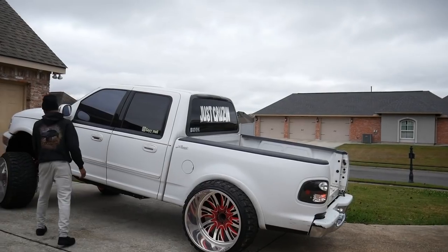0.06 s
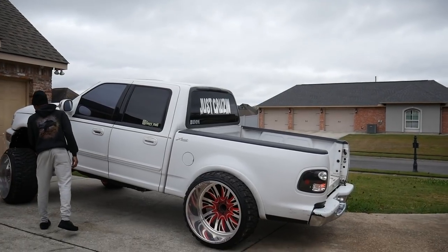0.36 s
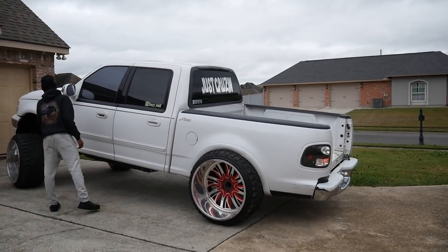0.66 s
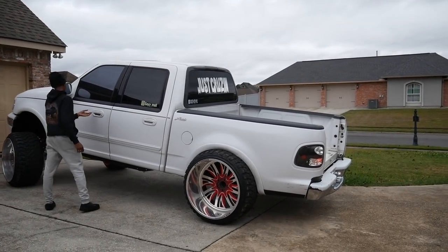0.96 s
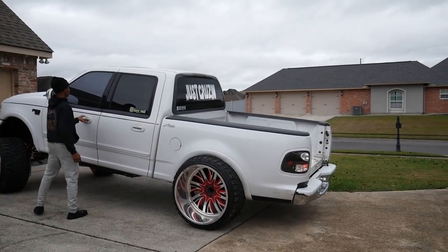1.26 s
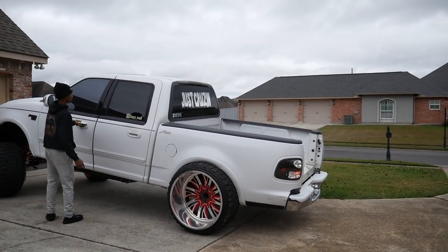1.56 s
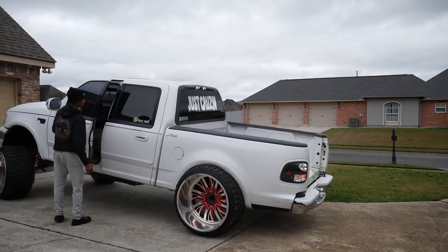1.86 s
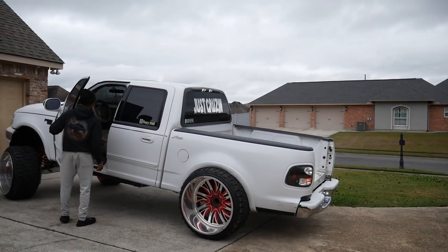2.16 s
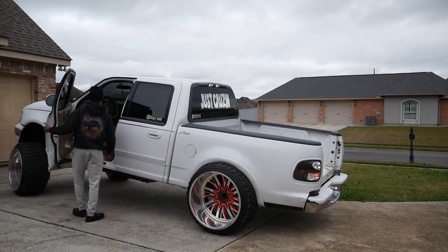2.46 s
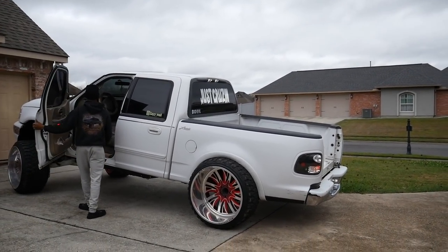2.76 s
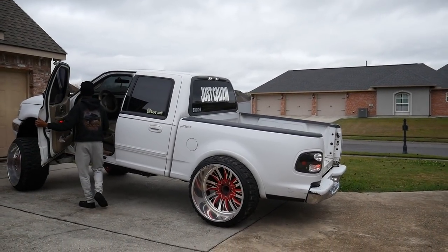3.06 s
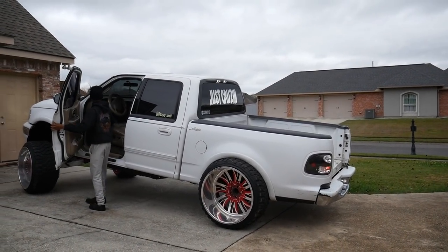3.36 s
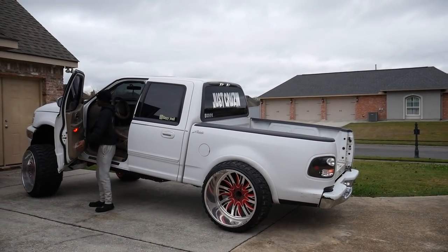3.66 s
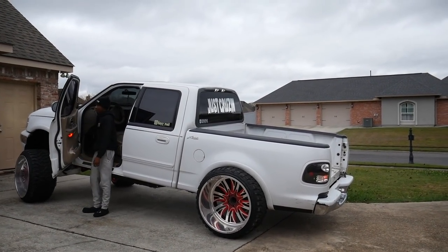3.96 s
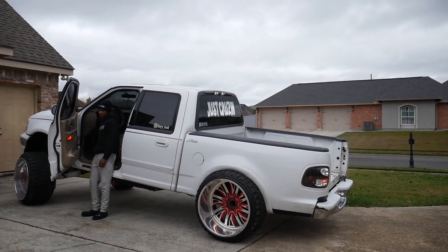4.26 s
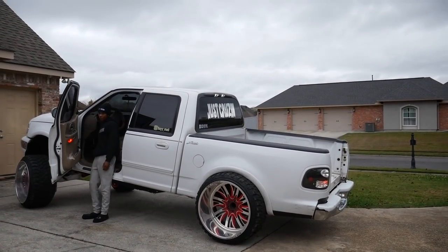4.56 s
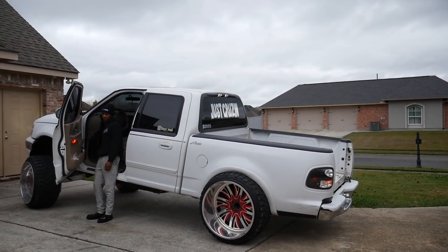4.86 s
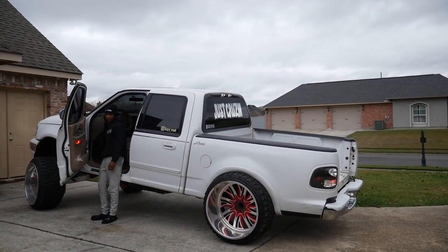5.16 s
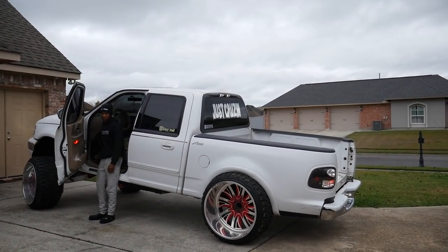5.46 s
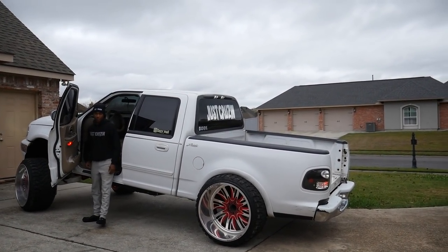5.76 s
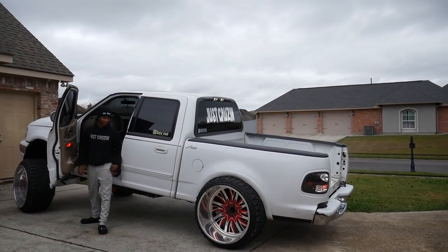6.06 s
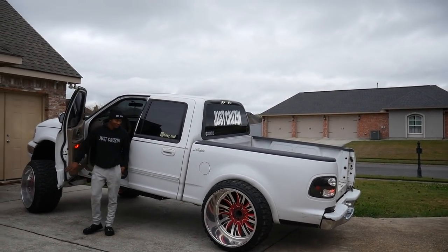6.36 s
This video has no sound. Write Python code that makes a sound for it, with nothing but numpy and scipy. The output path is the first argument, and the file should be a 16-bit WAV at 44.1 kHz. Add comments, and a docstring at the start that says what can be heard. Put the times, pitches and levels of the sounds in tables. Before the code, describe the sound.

A pickup truck idles close by in a driveway, its open exhaust beating with a deep, uneven throb over a light engine hiss and thin belt whine. A few very faint shoe scuffs and door latch clicks sit underneath. After nearly five seconds the engine is revved once, hard, rising into a rasping roar, then winds down with spits and dull pops. A short echo comes off the house and concrete.

```python
"""A V8 pickup, revved once

A truck with an open exhaust idles with a lope (an uneven beat) in a driveway, is revved once, spits
as it coasts and winds down. Uneven firings ring the pipe; at speed they merge into a drone and drive
rushes of rasping gas. Belt pulleys whine, the engine bay hisses and ticks, shoes and a door latch tap
lightly, and the house and the concrete throw it all back."""
import sys
import numpy as np
from scipy import signal
from scipy.fft import rfft, irfft, next_fast_len
from scipy.io import wavfile
from scipy.ndimage import uniform_filter1d

SR = 44100
rng = np.random.default_rng(int(sys.argv[2]) if len(sys.argv) > 2 else 0)


def store_pcm(level_fs):
    """Save levels as 16-bit WAV."""
    pcm = np.round(np.clip(level_fs, -1, 1) * 32767).astype(np.int16)
    wavfile.write(sys.argv[1], SR, np.atleast_2d(pcm).T)


N = 282681

# Engine speed, with eight firings in two turns of the crank: (time [s], firing rate [Hz])
FIRING_RATE = [(0, 57.04), (1.5, 57.13), (2.7, 56.74), (3.2, 57), (4.69, 56.93), (4.85, 94), (5.0, 125),
               (5.17, 196), (5.24, 216), (5.37, 223), (5.6, 192), (6.0, 147), (6.41, 110)]
# The cylinders in firing order: (strength at idle [dB], lateness at idle [crank degrees],
# strength at speed [dB], lateness at speed [crank degrees])
CYLINDERS = [(2, -45.5, -1, 7), (0.5, 16.5, 2.5, 30.5), (4.5, -6, -11.5, 17.5), (4, -35, 0, -6.5),
             (2.05, -45, 0.5, 17), (1.1, -45, -3, 11), (6, -11, 0, -3), (3.5, -12, 0.5, 34)]
# The gas pedal: (time [s], how far down [0-1])
PEDAL = [(5.21, 1), (5.27, 0.4)]
# Pulses are hard under load and soft once the throttle closes: (time [s], hardness [0-1])
HARDNESS = [(4.69, 0), (4.78, 0.3), (5.0, 0.3), (5.15, 0.54), (5.45, 0.5), (5.8, 0.17), (6.1, 0.08),
            (6.41, 0.23)]
# Ragged burning as the engine coasts down: (time [s], raggedness [0-1])
RAGGEDNESS = [(5.5, 0), (5.78, 1)]
# Tone of the soft and of the hard pulses: (frequency [Hz], gain [dB])
SOFT_PULSE = [(25, -60), (45, 1.5), (56, -19), (80, -1), (115, -1.15), (150, -13.5), (260, -9.5),
              (450, -16.5), (600, -21.5), (900, -34), (1500, -31.5), (4000, -78)]
HARD_PULSE = [(45, -60), (65, -37), (90, -29), (115, 1.5), (140, -10.5), (190, 5), (260, -19), (310, -4.5),
              (450, -4.5), (600, -20), (900, -18), (1500, -19), (4000, -79)]
# Resonances, the pitches at which the pipe rings: (frequency [Hz], width [Hz], boost [dB])
PIPE_RESONANCES = [(96.3, 8.3, 10.5), (136.33, 19.9, 31.5), (196.5, 73.5, 13), (329.7, 74, 6),
                   (435.7, 43.3, 15)]
# Loudness of the exhaust note: (time [s], level [dB])
EXHAUST_LEVEL = [(0, -23), (4.72, -22.5), (4.8, -26), (4.97, -27.5), (5.14, -20.5), (5.26, -25),
                 (5.42, -24.5), (5.65, -23.5), (5.85, -20.5), (6.0, -22.5), (6.14, -27.5), (6.41, -24.5)]
# Gaps in the idle's beat: (place in the firing order [firings], depth [dB])
LOPE_GAPS = [(3.9, -2), (4.6, -2.5), (7.05, -5)]
# Slow swell of the exhaust's middle pitches: (time [s], boost [dB])
MIDRANGE_BOOST = [(0, -2), (1.5, 0), (2.6, 5), (3.5, 2), (4.7, 4)]
# Overtones of the eight-firing cycle, relative to the exhaust note:
# (multiple of the cycle rate, level with pedal down [dB], level coasting [dB])
OVERTONES = [(5, -17, -15), (6, -22, -14), (9, -12, -11), (10, -11, -14), (11, -12, -9.5), (13, -13, -16),
             (16, -18, -14), (19, -17, -26)]
# Resonances of the hot pipe that they glide through: (frequency [Hz], width [Hz], boost [dB])
HOT_PIPE_RESONANCES = [(127, 66, 6), (181, 100, 7), (325, 55, 5), (462, 57, 13)]
# The clean tone at the firing rate: (time [s], level [dB])
FIRING_TONE = [(4.78, -23), (4.9, -32), (5.03, -25), (5.17, -26.5), (5.28, -42), (5.34, -44), (5.42, -20.5),
               (5.6, -32.5), (5.9, -31.5), (6.1, -46), (6.3, -29)]
# Three pipe resonances that roar above idle: (frequency [Hz], width [Hz])
ROAR_RESONANCES = [(325, 136), (445, 70), (600, 200)]
# Their loudness: (time [s], lower [dB], middle [dB], upper [dB])
ROAR_LEVELS = [(4.83, -36.5, -33, -34), (4.98, -35, -44, -48), (5.08, -28, -35, -35),
               (5.14, -26, -22.5, -31), (5.2, -27, -28, -29.5), (5.31, -28, -26, -31.5),
               (5.39, -26.5, -34, -38.5), (5.6, -31, -34, -34), (5.86, -30, -34, -44), (6.0, -41, -48, -52),
               (6.2, -32, -47, -55), (6.41, -30, -35, -44)]
# Rushes of gas as the throttle cracks open, at two stabs and twice while coasting:
# (start [s], length [s], rasp level [dB], hiss level [dB])
RUSHES = [(4.647, 0.056, -37, -39), (4.714, 0.097, -26.5, -29), (4.991, 0.16, -24, -31.5),
          (5.382, 0.24, -27.5, -34), (5.792, 0.19, -42, -51)]
# Tone of the gas's low rasp and of its bright hiss: (frequency [Hz], gain [dB])
RASP_TONE = [(50, -35), (150, -3), (400, 1.5), (600, 0), (1000, -8.5), (1400, -5), (2000, -4.5),
             (2800, -9.5), (3400, -10.5), (4000, -16), (8000, -42)]
HISS_TONE = [(60, 9), (300, -5), (1500, -4), (3000, 1), (5000, 6), (7000, 1), (10000, -2.5), (12500, -9.5),
             (15000, -18.5)]
# Sharp spits of gas: (time [s], relative level [dB])
SPITS = [(4.7065, -14.5), (4.722, -12.5), (4.7564, -17), (4.8595, -27.5), (5.0374, -24), (5.11, -31),
         (5.431, -13.5), (5.469, -14), (5.508, -19), (5.5478, -18)]
# Dull pops while coasting: (time [s], pitch [Hz], peak level [dB])
POPS = [(5.745, 372, -21), (5.785, 440, -23.5), (5.79, 114.4, -21), (5.835, 304.4, -26), (5.885, 500, -33),
        (6.065, 433, -23.5), (6.101, 339.7, -28)]
# Air whistling past the throttle: (start [s], length [s], from [Hz], to [Hz], level [dB])
WHISTLES = [(4.72, 0.025, 1480, 1600, -28), (4.767, 0.033, 1750, 2500, -27), (4.785, 0.07, 1950, 2050, -34),
            (5.033, 0.025, 2250, 2600, -30), (5.09, 0.085, 1600, 1900, -28.5)]
# Tone of the fan and belt hiss: (frequency [Hz], gain [dB])
BAY_TONE = [(350, -20.5), (600, -3), (633, -1), (936, -7.5), (1010, -7.5), (1180, -11.5), (1400, -7.5),
            (1630, -11.5), (1860, -10), (2280, -18.5), (2470, -17), (7860, -29.5), (10200, -29.5),
            (15000, -46.5)]
# Tones of the alternator: (multiple of its shaft speed, level [dB])
ALTERNATOR_TONES = [(12, -52.5), (13, -69), (14, -82), (15, -83), (16, -55.5), (17, -61), (18, -57),
                    (19, -55), (21, -58), (22, -56.5), (24, -53.5), (25, -59), (26, -52), (28, -50.5),
                    (35, -61.5), (36, -72), (38, -60.5), (39, -64.5), (42, -69)]
# The pulley's tone and a side tone each way from its wobble: (offset [firing rates], gain [dB])
PULLEY_TONES = [(-0.937, -14), (0, -0.7), (0.937, -9)]
# A belt squeal and the alternator's 20th tone, each swelling and fading near 1 kHz:
# (squeal pitch [firing rates], alternator pitch [firing rates])
SWELLING_RATIOS = (18.38, 18.214)
# Loudness of these tones: (time [s], pulley [dB], belt squeal [dB], alternator's 20th tone [dB])
WHINE_LEVELS = [(0, -51, -60, -60), (0.45, -51, -51, -58), (0.8, -50, -52, -58), (1.3, -50, -62, -57),
                (2.0, -50, -68, -51), (2.7, -49, -68, -49.5), (3.3, -47, -68, -62), (4.65, -46, -68, -62)]
# Taps of shoes and the door latch: (time [s], relative level [dB], ring pitch [Hz], decay [s])
TAPS = [(0.717, -52, 4500, 0.022), (1.0171, -49, 7000, 0.0067), (1.561, -45, 3300, 0.016),
        (1.7156, -51, 5000, 0.012), (2.3044, -52, 5170, 0.0114), (3.2447, -48, 4000, 0.01),
        (3.8269, -51, 3300, 0.0068), (3.9486, -48, 4000, 0.0083)]


def firings(count, revved, idle_scatter_db=.7, fast_scatter_db=2, ragged_scatter_db=1.5):
    """One pulse a firing. Each cylinder has its own strength and timing, and burns unevenly at speed."""
    number = np.arange(int(count[-1]) + 1)
    idle_db, idle_deg, fast_db, fast_deg = np.array(CYLINDERS)[number % 8].T
    fast = np.interp(number, count, revved)
    ragged = np.interp(number, count, curve(RAGGEDNESS))
    timing_luck, strength_luck = rng.standard_normal((len(number), 2)).T
    idle_db = idle_db + idle_scatter_db * strength_luck
    fast_db = fast_db + (fast_scatter_db + ragged * ragged_scatter_db) * strength_luck
    lateness = blend(idle_deg, fast_deg, fast) / 90  # firings are 90 crank degrees apart
    at = np.interp(number + lateness, count, np.arange(N))
    jitter_s = (.00012 + ragged * .0002) * timing_luck
    return clicks(at + SR * jitter_s, gain(blend(idle_db, fast_db, fast)))


def exhaust(pulses, revved, hardness, puff_s=.004, fast_ring=.3):
    """Each pulse and its swirling wake ring the pipe. At speed, pulses harden and flow damps the ring."""
    puffs = fade(pulses, puff_s) * rng.standard_normal(N)
    wake = colour(puffs, [(120, -12), (250, 2), (500, 6), (900, 7)])
    drive = blend(.02, .018, hardness) * wake - pulses
    drive = pipe_bends(drive + .45 * delay(drive, .0302))  # with a slap from the garage wall
    damped = [(hz, width, fast_ring * db) for hz, width, db in PIPE_RESONANCES]
    idling = level_out(colour(drive, SOFT_PULSE, PIPE_RESONANCES))
    coasting = level_out(colour(drive, SOFT_PULSE, damped))
    pulling = level_out(colour(drive, HARD_PULSE, damped))
    at_speed = level_out(blend(coasting, pulling, hardness))
    return level_out(blend(idling, at_speed, revved))


def pipe_bends(x, centres_hz=(255, 330), width_hz=45):
    """The bends of the pipe hold back the middle pitches of each pulse and smear it."""
    for hz in centres_hz:
        x = x - 2 * ring(x, hz, width_hz)
    return x


def lope(count, revved, gap_firings=.35):
    """A gain that makes the idle sag briefly between its groups of beats."""
    db = 0
    for place, depth_db in LOPE_GAPS:
        distance = (count - place + 4) % 8 - 4  # firings from the nearest repeat of this gap
        db = db + depth_db * np.exp(-.5 * (distance / gap_firings) ** 2)
    return gain((1 - revved) * db)


def chug(note, count, revved, rest_gain=.6, bark_gain=1.6, sharpness=2.5, at_firing=.6):
    """At idle the top pipe resonance barks once every eight firings, and the midrange slowly swells."""
    beat = np.exp(sharpness * (np.cos(2 * np.pi * (count - at_firing) / 8) - 1))
    bark = blend(rest_gain, bark_gain, beat)
    note = note + (1 - revved) * (bark - 1) * ring(note, hz=435, width_hz=80)
    return note + (gain(curve(MIDRANGE_BOOST)) - 1) * ring(note, hz=350, width_hz=220)


def tailpipe(note, revved, thin_hz=72):
    """The note leaves the pipe at its set loudness; at speed its deep thud thins out."""
    thin = signal.sosfiltfilt(signal.butter(4, thin_hz, "high", fs=SR, output="sos"), note)
    return level_out(blend(note, thin, revved)) * gain(curve(EXHAUST_LEVEL))


def drone(count, rate_hz, revved, wobble_rad=.25, waver_db=2.5, ragged_db=-7):
    """At speed the firings merge into clean tones that swell as they pass the hot pipe's resonances."""
    pedal = curve(PEDAL)
    overtones = 0
    for multiple, pulling_db, coasting_db in OVERTONES:
        ring_db = resonance_db(multiple * rate_hz / 8, HOT_PIPE_RESONANCES)
        db = blend(coasting_db, pulling_db, pedal) + ring_db + waver_db * wander(25)
        phase = 2 * np.pi * (multiple * count / 8 + rng.random()) + wobble_rad * wander(40)
        overtones = overtones + gain(db) * np.sin(phase)
    overtones = overtones * gain(curve(EXHAUST_LEVEL) + ragged_db * curve(RAGGEDNESS))
    firing_tone = gain(curve(FIRING_TONE)) * np.sin(2 * np.pi * count + wobble_rad * wander(40))
    return np.sqrt(2) * revved * (overtones - firing_tone)


def roar(pulses, revved, puff_s=.003, turbulence=.06):
    """Above idle, each firing and its swirling puff hammer the middle resonances of the pipe."""
    drive = pulses + turbulence * fade(pulses, puff_s) * rng.standard_normal(N)
    out = 0
    for column, (hz, width_hz) in enumerate(ROAR_RESONANCES, 1):
        ringing = ring(ring(drive, hz, width_hz), hz, width_hz)
        out = out + level_out(ringing) * gain(curve(ROAR_LEVELS, column))
    return revved * out


def gas_jet(pulses, rate_hz, revved, puff_s=.004, steady=1.15, flutter_db=.9, attack_s=.059):
    """Gas rasps and hisses in puffs, one a firing: short rushes over a flow that grows with speed."""
    puffs = fade(pulses, puff_s)
    puffs = puffs / np.sqrt(uniform_filter1d(puffs ** 2, SR // 10) + 1e-9)
    throb = (steady + puffs) * gain(flutter_db * wander(90))
    flow = revved * gain(8 * np.log2(rate_hz / 160))  # 8 dB louder for each doubling of speed
    rasp_level, hiss_level = flow * gain(-46), flow * gain(-75)
    for start_s, length_s, rasp_db, hiss_db in RUSHES:
        rasp_rush = gain(rasp_db) * swell(start_s, length_s, attack_s, fall_db_per_s=72)
        hiss_rush = gain(hiss_db) * swell(start_s, length_s, attack_s, fall_db_per_s=90)
        rasp_level = np.hypot(rasp_level, rasp_rush)  # noises add by power
        hiss_level = np.hypot(hiss_level, hiss_rush)
    rasp = unit(colour(throb * stereo_noise(side=.12), RASP_TONE))
    hiss = unit(colour(throb * stereo_noise(side=.11), HISS_TONE))
    return rasp_level * rasp + hiss_level * hiss


def spits(decay_s=.011, gain_db=-8):
    """Short cracks as the throttle snaps open and as fuel lights in the pipe."""
    times_s, db = np.transpose(SPITS)
    bursts = fade(clicks(times_s * SR, gain(db + gain_db)), decay_s)
    return bursts * unit(colour(stereo_noise(side=.3), HISS_TONE))


def pops(attack_s=.011, hold_s=.014, fall_db_per_s=330):
    """Dull pops as the engine coasts, each briefly ringing the pipe."""
    t = np.arange(N) / SR
    out = 0
    for start_s, hz, db in POPS:
        level = gain(db) * swell(start_s, hold_s, attack_s, fall_db_per_s)
        out = out + level * np.sin(2 * np.pi * (hz * t + rng.random()))
    return out


def throttle_whistles(breath_hz=210):
    """Breathy whistles that rise as the throttle plate opens."""
    out = 0
    for start_s, length_s, from_hz, to_hz, db in WHISTLES:
        hz = curve([(start_s, from_hz), (start_s + length_s, to_hz)])
        breath = signal.sosfilt(signal.butter(2, breath_hz, fs=SR, output="sos"), stereo_noise(side=.13))
        level = gain(db) * swell(start_s, length_s, attack_s=.008, fall_db_per_s=337)
        out = out + level * unit(breath * np.sin(2 * np.pi * np.cumsum(hz) / SR))
    return out


def engine_bay(count, revved, idle_db=-41, revved_change_db=-2, tick_depth=.26, tick_scatter_db=8):
    """Fan and belt hiss with the uneven ticking of the valves, two ticks a firing."""
    at = np.interp(np.arange(1, count[-1], .5), count, np.arange(N))
    strengths = gain(tick_scatter_db * np.minimum(rng.standard_normal(len(at)), 2))
    ticks = fade(clicks(at, strengths), decay_s=.0048)
    hiss = colour(stereo_noise(side=.1) * (1 + tick_depth * ticks), BAY_TONE)
    return unit(hiss) * gain(idle_db + revved_change_db * revved)


def belt_whine(count, revved, alternator_ratio=.9107, pulley_ratio=17.645, waver_db=1.5, wobble_rad=.26):
    """Alternator, pulley and belt tones follow the crank's speed, and fade out as the engine revs."""
    tones = [(multiple * alternator_ratio, db) for multiple, db in ALTERNATOR_TONES]
    tones += [(pulley_ratio + offset, curve(WHINE_LEVELS) + db) for offset, db in PULLEY_TONES]
    tones += [(ratio, curve(WHINE_LEVELS, column)) for column, ratio in enumerate(SWELLING_RATIOS, 2)]
    out = 0
    for ratio, db in tones:
        phase = 2 * np.pi * (ratio * count + rng.random()) + wobble_rad * wander(25.2)
        out = out + gain(db + waver_db * wander(1.67)) * np.sin(phase)
    return np.sqrt(2) * out * (1 - revved)


def taps(gain_db=-11, width_hz=800, ring_db=9, attack_s=.005, grain_db=3):
    """Shoes and the door latch make small grainy scuffs and clicks, each with its own ring."""
    grit = stereo_noise(side=.3) * gain(grain_db * wander(250))
    out = 0
    for time_s, db, hz, decay_s in TAPS:
        fall_db_per_s = 20 / np.log(10) / decay_s
        level = gain(db + gain_db) * swell(time_s - attack_s, attack_s, attack_s, fall_db_per_s)
        out = out + level * unit(grit + gain(ring_db) * ring(grit, hz, width_hz))
    return colour(out, [(800, 2), (2500, 8), (6000, 16.5), (14000, 0)])


def side_echo(x, lag_s=.009, echo_db=-21):
    """The boom also comes back from the side, pushing the two ears in opposite directions."""
    boom = ring(x.mean(axis=0), hz=100, width_hz=150)
    return x + gain(echo_db) * delay(boom, lag_s) * np.array([[1], [-1]])


def driveway(x, fall_60_db_s=.62, gain_db=-18):
    """Add scattered echoes from house, truck body and concrete, different in each ear."""
    t = np.arange(SR // 2) / SR
    tail = rng.standard_normal((2, len(t))) * gain(-60 * t / fall_60_db_s) * (t > .003)
    tail /= np.sqrt(np.sum(tail ** 2, axis=1, keepdims=True))
    echo = signal.fftconvolve(x.mean(axis=0)[None], tail, axes=1)[:, :N]
    return x + gain(gain_db) * colour(echo, [(120, -9), (300, 4.5), (900, 9.5), (3000, 10), (12000, 14)])


def gain(db):
    """Turn decibels into a number to multiply by."""
    return 10 ** (np.asarray(db) / 20)


def blend(a, b, amount):
    """Slide from a to b as the amount goes from 0 to 1."""
    return (1 - amount) * a + amount * b


def curve(table, column=1):
    """Join the points of a timed table with straight lines, one value a sample."""
    rows = np.array(table)
    return np.interp(np.arange(N) / SR, rows[:, 0], rows[:, column])


def swell(start_s, length_s, attack_s, fall_db_per_s):
    """Rise, hold until the length is over, then die away."""
    age = np.arange(N) / SR - start_s
    return np.clip(age / attack_s, 0, 1) * gain(-fall_db_per_s * np.maximum(age - length_s, 0))


def unit(x):
    """Scale to an average (rms) level of 1."""
    return x / np.sqrt(np.mean(x ** 2))


def level_out(x):
    """Hold the level near 1, averaged over about one idle cycle."""
    power = uniform_filter1d(x ** 2, int(.14 * SR))
    return x / np.sqrt(uniform_filter1d(power, int(.07 * SR)))


def ring(x, hz, width_hz):
    """One resonance: keep what lies near its pitch."""
    return signal.lfilter(*signal.iirpeak(hz, hz / width_hz, fs=SR), x)


def resonance_db(hz, resonances):
    """The boost that a set of resonances gives at each frequency."""
    return sum(db / (1 + (2 * (hz - centre) / width) ** 2) for centre, width, db in resonances)


def colour(x, outline, resonances=()):
    """Shape the tone by an outline of (frequency [Hz], gain [dB]) with resonances on top."""
    size = next_fast_len(N + SR // 2, real=True) // 2 * 2
    hz = np.fft.rfftfreq(size, 1 / SR) + 1
    outline_hz, outline_db = np.transpose(outline)
    db = np.interp(np.log(hz), np.log(outline_hz), outline_db) + resonance_db(hz, resonances)
    # Fold the filter so that it rings only after each pulse (minimum phase).
    cepstrum = irfft(np.log(gain(db)))
    cepstrum[1:size // 2] *= 2
    cepstrum[size // 2 + 1:] = 0
    return irfft(rfft(x, size) * np.exp(rfft(cepstrum)))[..., :N]


def wander(rate_hz):
    """Smooth random drift with a spread of 1."""
    step = int(SR / rate_hz)
    stairs = np.repeat(rng.standard_normal(N // step + 1), step)
    return unit(uniform_filter1d(uniform_filter1d(stairs, step), step)[:N])


def clicks(at, size):
    """Clicks at sample positions, each shared between its two nearest samples."""
    at = np.clip(at, 0, N - 2)
    i = at.astype(int)
    return np.bincount(i, size * (1 - at + i), N) + np.bincount(i + 1, size * (at - i), N)


def fade(x, decay_s):
    """Give each click a dying tail."""
    return signal.lfilter([1], [1, -np.exp(-1 / (decay_s * SR))], x)


def delay(x, lag_s):
    """The same sound, later."""
    return np.pad(x, (int(lag_s * SR), 0))[:N]


def stereo_noise(side):
    """White noise, mostly alike in both ears."""
    middle, wide = rng.standard_normal((2, N))
    return middle + side * wide * np.array([[1], [-1]])


def scene():
    """The truck idles and revs in the driveway, with light taps beside it."""
    rate_hz = curve(FIRING_RATE)
    count = .46 + np.cumsum(rate_hz) / SR  # firings so far
    revved = np.clip((rate_hz - 57.2) / 32, 0, 1)  # 0 at idle, 1 at speed
    pulses = firings(count, revved)
    note = exhaust(pulses, revved, curve(HARDNESS)) * lope(count, revved)
    pipe = tailpipe(chug(note, count, revved), revved) + drone(count, rate_hz, revved)
    bay = engine_bay(count, revved) + belt_whine(count, revved)
    rev = roar(pulses, revved) + gas_jet(pulses, rate_hz, revved) + throttle_whistles()
    truck = pipe + bay + rev + spits() + pops()
    return driveway(side_echo(truck) + taps()) * gain([[.3], [-.3]])  # a touch louder on the left


def record(dry):
    """Cut the deep rumble below 46 Hz and the treble above 15.4 kHz."""
    dry = signal.sosfiltfilt(signal.butter(4, 46, "high", fs=SR, output="sos"), dry)
    return signal.sosfilt(signal.ellip(8, .2, 70, 15400, fs=SR, output="sos"), dry)


dry = scene()
out = record(dry)
store_pcm(out)
```